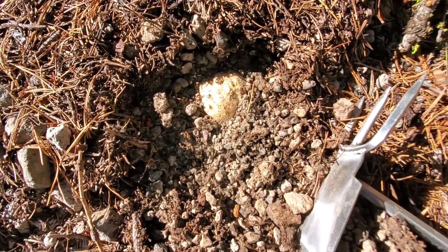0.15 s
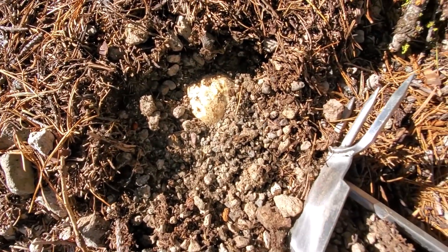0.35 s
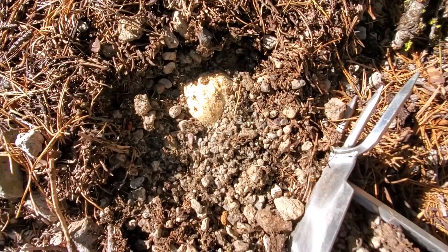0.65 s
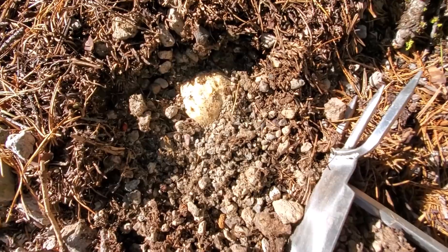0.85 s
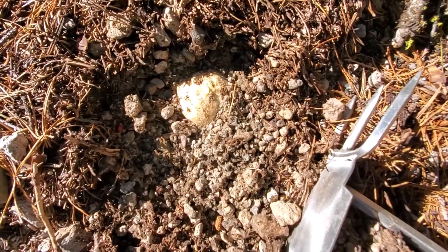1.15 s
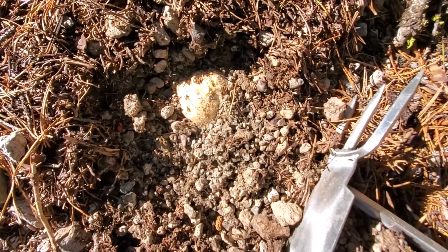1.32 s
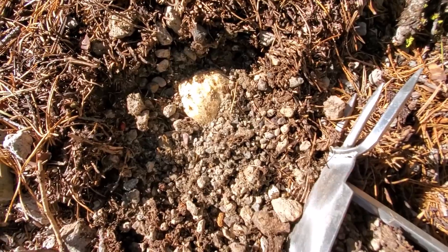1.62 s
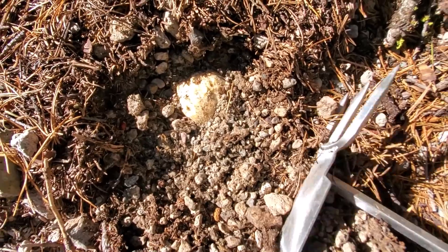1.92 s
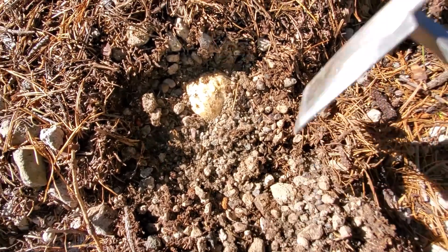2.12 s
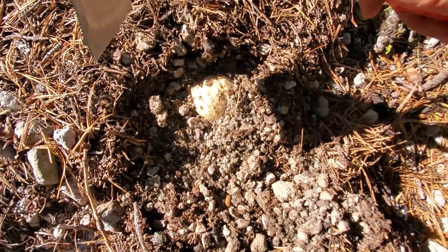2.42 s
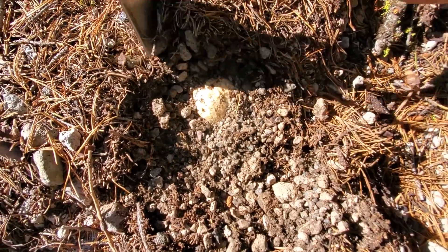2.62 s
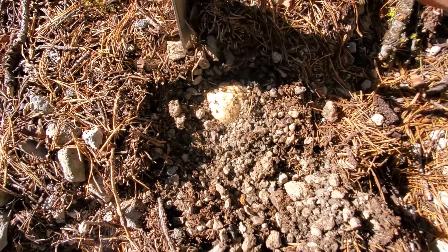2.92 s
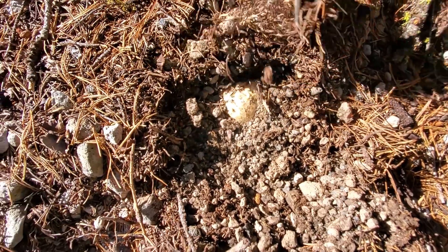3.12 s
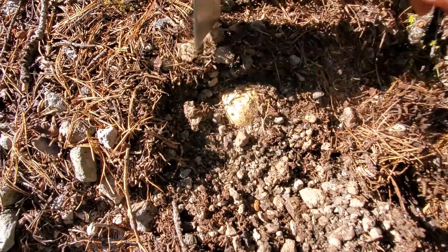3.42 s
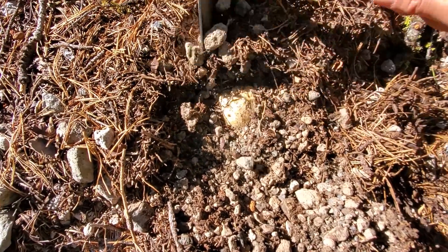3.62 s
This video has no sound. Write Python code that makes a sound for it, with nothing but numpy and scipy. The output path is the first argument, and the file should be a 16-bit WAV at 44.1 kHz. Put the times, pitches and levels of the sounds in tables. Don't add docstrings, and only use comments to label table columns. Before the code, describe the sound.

Soft handling taps and rubs on the right come first; tines ring lightly, metal clanks, then bright crunching strokes dig through grit and needles, with low thumps, in quiet open air.

```python
import sys
import numpy as np
from scipy import signal
from scipy.io import wavfile
from scipy.ndimage import uniform_filter1d

SR = 44100
rng = np.random.default_rng(int(sys.argv[2]) if len(sys.argv) > 2 else 0)


def makeup_ratio(level_db):
    decades = np.asarray(level_db, float) / 20
    return 10 ** decades


def pcm_store(signal):
    levels = np.round(np.clip(np.atleast_2d(signal), -1, 1) * 32767)
    wavfile.write(sys.argv[1], SR, levels.astype(np.int16).T)


N = 165375
SECONDS = np.arange(N) / SR
DIG_S = 2.5
BUMP_PAN_DB, JOLT_PAN_DB = -39, -2.0


def evened(x):
    return x / np.sqrt(np.mean(x ** 2) + 1e-20)


def read(points, hz):
    f, value = np.transpose(points)
    return np.interp(np.log(hz + 1), np.log(f + 1), value)


def colour(x, points):
    hz = abs(np.fft.fftfreq(4096, 1 / SR))
    log_gain = np.log(makeup_ratio(np.maximum(read(points, hz), -80)))
    taps = np.fft.ifft(np.exp(np.conj(signal.hilbert(log_gain)))).real[:2048]
    return signal.oaconvolve(x, taps[None], axes=1)[:, :x.shape[1]]


def resonate(x, hz, width):
    return signal.lfilter(*signal.iirpeak(hz, hz / width, SR), x)


def steep(x, hz, width):
    return resonate(resonate(resonate(x, hz, width), hz, width), hz, width)


def placed(pan_db):
    left = makeup_ratio(np.asarray(pan_db) / 2)
    return np.array([left, 1 / left]) * 2 / (left + 1 / left)


def add(mix, s, sound):
    part = mix[:, round(max(s, 0) * SR):][:, :sound.shape[1]]
    part += sound[:, :part.shape[1]]


def strokes(rows, rise_s, fall_s):
    power = np.zeros(N)
    for s, length, db in rows:
        rise = np.clip((SECONDS - s) / rise_s, 0, 1)
        fall = np.exp(-np.maximum(SECONDS - s - length, 0) / (fall_s + 0.12 * length))
        power += (makeup_ratio(db) * rise * fall) ** 2
    return np.sqrt(power)


def clumps(depth_db):
    wander = uniform_filter1d(uniform_filter1d(rng.standard_normal(N), 300), 300)
    return makeup_ratio(depth_db * evened(wander))


def grains(per_s, spread_db, hiss_db, shared):
    size = makeup_ratio(spread_db * np.minimum(rng.exponential(1, N), 4))
    size = evened(size * (rng.random(N) < per_s / SR)) + makeup_ratio(hiss_db)
    a, b = rng.standard_normal((2, N)) * size
    same = np.clip(shared, 0, 1)
    return np.array([a, same * np.roll(a, 3) + np.sqrt(1 - same ** 2) * b])


def patchy(x):
    z = signal.stft(x, nperseg=256)[2]
    field = uniform_filter1d(rng.standard_normal(z.shape[1:]), size=7, axis=0)
    field = evened(uniform_filter1d(field, size=5, axis=1))
    return evened(signal.istft(z * makeup_ratio(3.0 * field), nperseg=256)[1][:, :N])


def rings(pitches, modes):
    t, out = np.arange(SR // 2) / SR, 0
    for hz, (db, t60, pan_db) in zip(pitches, modes):
        phase = rng.standard_normal((2, 1))
        mode = makeup_ratio(db - 60 * t / t60) * np.sin(2 * np.pi * hz * t + phase)
        out = out + placed(pan_db)[:, None] * mode
    return out * np.minimum(t / 0.0029, 1)


# frequency in Hz, level in dB.
AIR_TONE = [(15, -42), (25, 8.5), (97, -10), (2820, -26), (7510, -31), (10700, -31.5), (16500, -35)]


def air():
    return makeup_ratio(-71.5) * evened(colour(rng.standard_normal((2, N)), AIR_TONE))


# frequency in Hz, level in dB.
MURMUR_TONE = [(60, -20.5), (170, 2.5), (750, -2.5), (1000, -31.5)]
# start in seconds, length in seconds, level in dB.
CASE_SHIFTS = [
    (.82, 0.41, -71.5),
    (1.7, 0.48, -73.5),
    (2.235, 0.24, -67),
    (2.255, 0.061, -48.5),
    (2.58, 0.46, -61),
    (3.075, 0.069, -45),
    (3.17, 0.038, -55.5),
]


def murmur():
    low = rng.standard_normal((2, N))
    rustle = evened(colour(low[0] + 0.7 * low, MURMUR_TONE) * clumps(2.4))
    return rustle * strokes(CASE_SHIFTS, 0.017, 0.014) * placed(-10.5)[:, None]


# start in seconds, length in seconds, level in dB.
GRIP_TREMBLES = [
    (0, 0.7, -67.5),
    (.75, 0.18, -60.5),
    (.98, 0.26, -67),
    (1.5, 0.12, -61),
    (2.52, 0.19, -56),
    (3.5, 0.26, -54),
]


def tremble():
    sway = evened(steep(rng.standard_normal(N), 59.4, 80)) * strokes(GRIP_TREMBLES, 0.044, 0.017)
    return placed(np.where(SECONDS < DIG_S + 0.1, BUMP_PAN_DB, JOLT_PAN_DB)) * sway


# start in seconds, thump in dB, knock in dB.
HAND_BUMPS = [
    (0.0, -61, -32),
    (0.145, -53, -70),
    (0.266, -44.5, -43.5),
    (0.493, -50.5, -44.5),
    (1.015, -47, -50),
    (1.151, -81, -47.5),
    (1.494, -47, -77),
    (1.745, -47, -83),
    (1.993, -54, -39.5),
    (2.503, -45.5, -61),
]
# start in seconds, thump in dB, knock in dB.
GROUND_JOLTS = [
    (2.268, -32.5, -32.5),
    (3.086, -38.5, -38.5),
    (3.121, -49, -46.5),
    (3.171, -37, -50),
    (3.475, -49, -50),
    (3.546, -48, -43.5),
    (3.681, -39, -37),
    (3.709, -33.5, -57),
]


def jolts():
    mount_hz, rise_s, knock_s = 69.1, 0.012, 0.012
    out, t = np.zeros((2, N)), np.arange(SR // 4) / SR
    for rows, pan_db in ((HAND_BUMPS, BUMP_PAN_DB), (GROUND_JOLTS, JOLT_PAN_DB)):
        for s, db, knock_db in rows:
            u = t / rise_s
            sway = u * np.exp(1 - u) * np.sin(2 * np.pi * mount_hz * rng.uniform(0.68, 1.32) * t)
            knock = rng.standard_normal((2, len(t))) * np.exp(-t / knock_s)
            knock = steep(knock[0] + 0.4 * knock, 311, 630)
            thump = makeup_ratio(db) * sway + makeup_ratio(knock_db) * knock / abs(knock).max()
            add(out, s, placed(pan_db)[:, None] * thump)
    return out


# frequency in Hz, level in dB.
SKIN_TONE = [(59, -44), (100, 0), (308, -4.5), (2420, 0.5), (4290, -5.5), (7290, -27.5), (8460, -23.5),
             (16000, -44)]
# frequency in Hz, left-right balance in dB.
SKIN_PAN = [(60, -14), (380, -21), (2380, -15), (15000, 26.5)]
# start in seconds, length in seconds, pressure in dB.
HAND_RUBS = [(0, 0.0049, -36.5), (.266, 0.057, -65), (.35, 0.074, -59), (.475, 0.049, -56.5),
             (.53, 0.066, -51.5), (.575, 0.045, -43), (.6, 0.045, -40.5), (.645, 0.045, -44.5),
             (.7, 0.072, -47), (.78, 0.059, -59.5), (1.15, 0.082, -68), (1.175, 0.017, -61)]
# start in seconds, peak in dB.
FINGER_TAPS = [(0.269, -50), (0.286, -44), (0.477, -34.5), (0.504, -40.5), (0.847, -53), (0.9, -53),
               (1.019, -64), (1.11, -64), (1.147, -52.5), (1.174, -63), (1.193, -61), (1.228, -49.5),
               (1.871, -66)]


def hand():
    rub = patchy(colour(grains(6000, 2.0, 0, 0.26) * clumps(1.2), SKIN_TONE))
    rub = rub * strokes(HAND_RUBS, 0.0097, 0.0073)
    t = np.arange(800) / SR
    for s, db in FINGER_TAPS:
        tap = colour(rng.standard_normal((1, 800)) * np.exp(-t / 0.0014), SKIN_TONE)
        add(rub, s, makeup_ratio(db + 1.0) * tap / abs(tap).max() * np.ones((2, 1)))
    left = colour(rub[:1], [(hz, db / 2) for hz, db in SKIN_PAN])[0]
    right = colour(rub[1:], [(hz, -db / 2) for hz, db in SKIN_PAN])[0]
    return 0.68 * np.array([np.roll(left, 20), right])


# time in seconds, left-right balance in dB.
TOOL_PLACE = [(0, -29), (.1, -9.5), (1.5, 6), (2.05, -1.5), (2.2, -5.5), (2.53, 14), (2.95, 5.5),
              (3.2, 2.5), (3.5, 7), (3.75, 4.5)]


def at_tool(s):
    return placed(np.interp(s, *np.transpose(TOOL_PLACE)))


# start in seconds, peak in dB, centre frequency in Hz.
SNAPS = [(0.368, -51, 13000), (1.673, -48, 10300), (2.151, -44.5, 13500), (2.558, -27, 13000),
         (2.655, -41, 10900), (2.699, -31.5, 12000), (2.710, -28.5, 3720), (2.722, -37, 12500),
         (2.746, -25, 11000), (2.758, -24, 11900), (2.782, -26, 9000), (2.796, -25, 11200),
         (2.845, -32, 10500), (2.850, -39, 13000), (2.950, -36, 13000), (2.972, -38, 14000),
         (3.015, -24.5, 3240), (3.084, -27.5, 3200), (3.119, -22, 12500), (3.175, -16.5, 5560),
         (3.237, -42, 13000), (3.289, -41, 12500), (3.295, -37, 12500), (3.477, -32, 12900),
         (3.486, -22, 12300), (3.544, -22, 13000), (3.561, -26, 11500), (3.745, -20, 4130)]


def ticks():
    out, t = np.zeros((2, N)), np.arange(600) / SR
    for s, db, hz in SNAPS:
        burst = rng.standard_normal((2, 600))
        snap = steep((burst[0] + burst) * np.exp(-t / 0.00043), hz, hz * 0.65)
        add(out, s, makeup_ratio(db) * at_tool(s)[:, None] * snap / abs(snap).max())
    return out


TINE_PITCHES = [3284, 5362, 7897, 9932, 12270, 13860, 4170]
# level in dB, t60 in seconds, left-right balance in dB.
TINE_MODES = [(-7.5, 0.23, 19), (2, 0.049, 21), (3.5, 0.1, 21), (0, 0.079, 0), (3.5, 0.21, 10),
              (4.5, 0.23, 13), (-7, 0.054, 16)]
# start in seconds, level in dB.
TINE_SLIPS = [
    (1.945, -71),
    (1.962, -54.5),
    (1.973, -48.5),
    (1.985, -48),
    (1.998, -49),
    (2.008, -55.5),
    (2.018, -57),
    (2.035, -61.5),
]
CLANK_PITCHES = [479, 1308, 1367, 2299, 12250, 12510, 13850, 200, 3278, 6115, 9082, 10150]
# level in dB, t60 in seconds, left-right balance in dB.
CLANK_MODES = [(-1.5, 0.18, -19), (-25, 1, 15), (-21, 1, 14), (-5.5, 0.34, 9), (-8, 0.16, 1), (-8, 0.1, 6),
               (-3.5, 0.32, 8), (-13, 0.28, -16), (-10.5, 0.071, 7), (-22, .09, 5), (-4, 0.051, -1),
               (-14, .05, 1)]


def steel():
    out = np.zeros((2, N))
    for s, db in TINE_SLIPS:
        add(out, s, makeup_ratio(db) * rings(TINE_PITCHES, TINE_MODES))
    add(out, 2.266, makeup_ratio(-34) * rings(CLANK_PITCHES, CLANK_MODES))
    add(out, 3.27, makeup_ratio(-64) * rings([1990], [(0, 0.3, 3.8)]))
    return out


BLADE_PITCHES = [2290, 3290, 5800, 9910, 12230, 13850]
# width in Hz, level in dB.
BLADE_MODES = [(108, -2.5), (156, -1), (195, -1), (150, -9.5), (50, -8.5), (24.1, -5.5)]


def blade_modes(x):
    return [(makeup_ratio(db) * resonate(x, hz, width), width)
            for hz, (width, db) in zip(BLADE_PITCHES, BLADE_MODES)]


# frequency in Hz, level in dB.
GRIT_TONE = [(1470, -21.5), (2500, -6.5), (5420, -6.5), (7320, -7), (12600, 2), (15750, -4.5), (16250, -35)]
# start in seconds, peak in dB, low blade share in dB, high blade ring in dB.
STONE_HITS = [(1.4454, -47.5, -11.5, -24), (2.2687, -19.5, -41, -3.5), (2.5416, -31, -30, 5),
              (2.593, -16.5, -37, -8), (2.8255, -29.5, -5, -18), (2.964, -15.5, -40, -20),
              (3.0115, -16, -24, -21), (3.1727, -10, -39, -22), (3.4035, -30.5, 6.5, 4.5),
              (3.434, -30.5, -7.5, 6), (3.4705, -25, -30, -14), (3.5295, -25, -2.5, -13),
              (3.5552, -17, -11, 0), (3.6829, -9, -10, -13), (3.6977, -18.5, -3.5, -31),
              (3.7361, -14, -14, -22)]


def stones():
    out, t = np.zeros((2, N)), np.arange(4000) / SR
    blow = np.ones((2, 1)) * np.exp(-t * SR / 2)
    modes = [sound / width for sound, width in blade_modes(blow)]
    low, high = sum(modes[:3]), sum(modes[3:])
    for s, db, low_db, ring_db in STONE_HITS:
        burst = rng.standard_normal((2, 4000)) * np.exp(-t / 0.0007)
        burst[1] += np.roll(burst[0], 4)
        parts = (0, colour(burst, GRIT_TONE)), (low_db, low), (ring_db, high)
        crack = sum(makeup_ratio(part_db) * part / abs(part).max() for part_db, part in parts)
        add(out, s, 0.64 * makeup_ratio(db) * at_tool(s)[:, None] * crack)
    return out


# frequency in Hz, level in dB.
SOIL_TONE = [(71, -19.5), (120, -5), (741, -10.5), (1370, -14.5), (2990, -13), (7000, -19.5), (9100, -17.5),
             (15400, -120)]
# frequency in Hz, level in dB.
NEEDLE_TONE = [(2500, -5.5), (4400, -5.5), (10500, 1.5), (14000, -6)]
# start in seconds, length in seconds, speed in dB, depth in soil in dB.
RAKE_STROKES = [(0, 0.0051, -48, -21), (0.278, 0.21, -73, 9), (0.613, 0.2, -66, -2.5),
                (1.333, 0.2, -76.5, -10), (1.66, 0.16, -65.5, -22), (1.855, 0.26, -67.5, -2.5),
                (1.939, 0.13, -62, -2.5), (1.968, 0.074, -54, -0.5), (2.073, 0.051, -56.5, -20),
                (2.087, 0.023, -58, -14), (2.127, 0.042, -68, -16), (2.189, 0.018, -59, -25),
                (2.213, .025, -60.5, -26), (2.263, 0.016, -46, 1.5), (2.298, 0.079, -65, 2.5),
                (2.516, .03, -59, -18), (2.535, 0.014, -45, -12), (2.549, 0.011, -39, -15.5),
                (2.578, 0.065, -40.5, -14), (2.593, 0.0033, -42.5, -13), (2.652, 0.01, -37.5, -20),
                (2.667, 0.13, -39, -13.5), (2.809, 0.06, -45.5, -11), (2.874, 0.091, -48.5, -10),
                (2.972, 0.033, -40.5, -19.5), (3.006, 0.056, -33.5, -12), (3.069, 0.031, -33.5, -7.5),
                (3.099, 0.062, -35, -12), (3.164, 0.023, -36, -11), (3.188, 0.021, -42.5, -14),
                (3.203, 0.17, -56, -9.5), (3.396, 0.044, -43.5, -8), (3.452, 0.045, -41.5, -11.5),
                (3.511, 0.055, -49, -6.5), (3.535, 0.026, -40.5, -5), (3.551, 0.019, -32.5, -5),
                (3.581, 0.19, -42.5, -6), (3.684, 0.016, -30.5, -6), (3.707, 0.047, -37, 0.5),
                (3.731, .03, -26.5, -10)]


def raking():
    rise_s, fall_s, hiss_db = 0.0048, 0.0066, -0.5
    speed = strokes([row[:3] for row in RAKE_STROKES], rise_s, fall_s)
    deep_rows = [(s, length, db + deep_db) for s, length, db, deep_db in RAKE_STROKES]
    depth = strokes(deep_rows, rise_s, fall_s)
    bite, digging = clumps(1.3), SECONDS > DIG_S
    grit = patchy(grains(11000, 3.5, hiss_db, 0.11) * bite) * speed
    ring = digging * sum(sound * np.sqrt(SR / width) for sound, width in blade_modes(grit))
    grit = np.where(digging, grit, colour(grit, NEEDLE_TONE))
    unit = np.sqrt(np.mean(colour(rng.standard_normal((1, 20000)), GRIT_TONE) ** 2))
    crumbs = patchy(colour(grains(3000, 3, hiss_db, 0.38) * bite, SOIL_TONE))
    return at_tool(SECONDS) * (1.03 * colour(grit, GRIT_TONE) / unit + makeup_ratio(-30) * ring + crumbs * depth)


def scene():
    around = air() + murmur() + tremble() + jolts() + hand()
    return around + ticks() + steel() + stones() + raking()


def low_pass(x):
    return signal.sosfilt(signal.butter(12, 16650, fs=SR, output="sos"), x)


def record(dry):
    dipped = dry - (1 - makeup_ratio(-13)) * resonate(dry, 7300, 1080)
    cut = signal.oaconvolve(dipped, signal.firwin(255, 16500, fs=SR)[None], "same")
    return low_pass(cut)


dry = scene()
out = record(dry)
pcm_store(out)
```